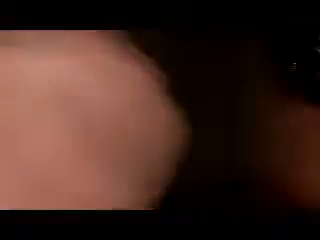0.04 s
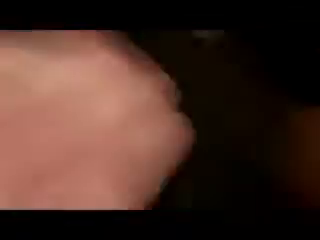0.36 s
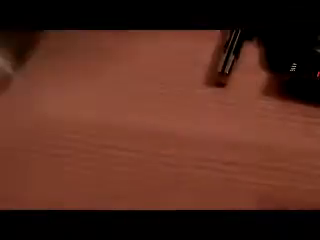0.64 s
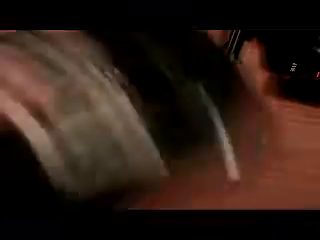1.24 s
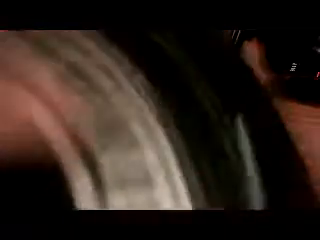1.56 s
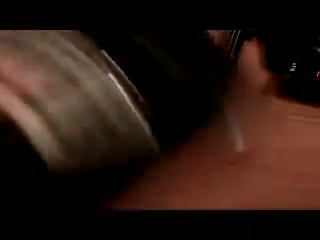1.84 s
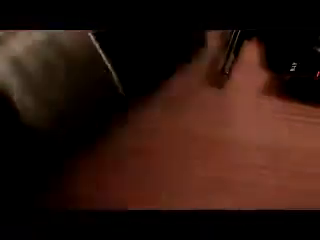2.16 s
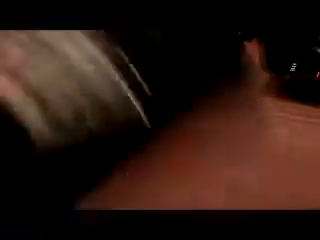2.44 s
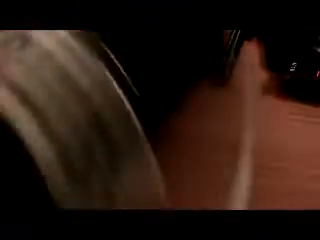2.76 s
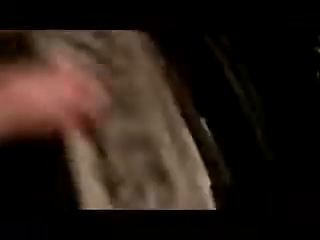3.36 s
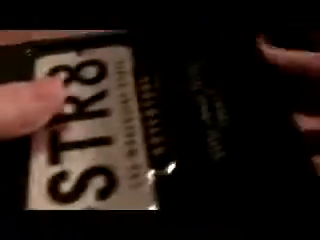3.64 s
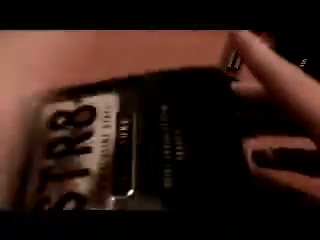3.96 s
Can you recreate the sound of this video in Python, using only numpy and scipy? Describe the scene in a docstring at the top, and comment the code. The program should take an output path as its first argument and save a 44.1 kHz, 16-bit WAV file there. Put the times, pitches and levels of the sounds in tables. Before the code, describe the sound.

A metal tin clatters with shaken loose items and is set down with a loud knock.

```python
"""Loose items clatter and slide in a metal tin, shaken by hand about six times a second.
Light items crackle against the walls; heavy ones make hollow, ringing clacks. In mid-shake
the tin knocks hard once on a wooden table. The shaking stops, the grip shifts with a few
small ticks, and the tin is set down with a knock that overloads the close microphone.
A small room adds a short echo."""
import sys
import numpy as np
from scipy import signal
from scipy.fft import rfft, irfft
from scipy.io import wavfile
from scipy.ndimage import uniform_filter1d

SR = 44100
rng = np.random.default_rng(int(sys.argv[2]) if len(sys.argv) > 2 else 0)


def master(y):
    """Save y as 16-bit WAV."""
    cut = np.clip(np.atleast_2d(y).T, -1, 1)
    pcm = np.round(cut * 32767)  # scale
    wavfile.write(sys.argv[1], SR, pcm.astype(np.int16))


N = 176400

# Levels in the tables are relative. A ring time (t60) is the time to fade by 60 dB.
# items tumble against a wall: t/s, build-up/s, light items' level/dB, heavy items' level/dB
CLATTERS = [(0.004, 0.001, -18.5, -22.5), (0.035, 0.0065, -16, -28), (0.096, 0.0027, -24.5, -18.5),
            (0.167, 0.001, -32, -22), (0.203, 0.0047, -22, -15), (0.254, 0.0057, -26.5, -15.5),
            (0.276, 0.003, -24, -22), (0.333, 0.0028, -23.5, -28), (0.3585, 0.018, -17.5, -19),
            (0.432, 0.0025, -19, -20.5), (0.526, 0.015, -21, -21), (0.588, 0.0084, -23, -19),
            (0.613, 0.0067, -22, -18.5), (0.691, 0.0052, -27, -32.5), (0.9026, 0.0022, -24, -22.5),
            (0.938, 0.0019, -17, -19.5), (1.01, 0.0078, -18, -19.5), (1.034, 0.0032, -19.5, -21),
            (1.068, 0.0043, -16, -18), (1.087, 0.0023, -12, -11.5), (1.164, 0.0082, -17, -17.5),
            (1.2378, 0.00096, -9, -13), (1.305, 0.0025, -18, -20.5), (1.318, 0.0083, -22.5, -17.5),
            (1.3883, 0.0048, -17.5, -19), (1.467, 0.0025, -23, -15), (1.542, 0.015, -20.5, -20),
            (1.679, 0.0011, -8, -15.5), (1.701, 0.0021, -18, -22), (1.765, 0.0064, -21, -16.5),
            (1.833, 0.011, -20.5, -24), (1.919, 0.0025, -18, -16), (1.982, 0.0062, -18.5, -22),
            (2.038, 0.017, -19.5, -25.5), (2.146, 0.0013, -16, -22), (2.188, 0.001, -19, -21),
            (2.219, 0.018, -29, -18), (2.2806, 0.0006, -24, -14), (2.369, 0.0022, -24.5, -14),
            (2.398, 0.011, -26.5, -16), (2.495, 0.0088, -20, -18), (2.535, 0.0065, -20, -12),
            (2.642, 0.0023, -16.5, -15), (2.677, 0.03, -27, -18), (2.827, 0.017, -23, -16.5),
            (2.927, 0.0023, -19, -28), (2.99, 0.0026, -22, -10), (3.037, 0.0014, -17.5, -36),
            (3.075, 0.015, -25, -36), (3.122, 0.0058, -19, -12.5), (3.164, 0.0051, -18.5, -20.5),
            (3.224, 0.0057, -21.5, -17), (3.269, 0.017, -20, -20.5), (3.43, 0.018, -21.5, -18.5)]
# items slide between clatters: t/s, heavy items' level/dB, light items' level/dB
SLIDING = [(0, -24.5, -29), (.62, -26.5, -32.5), (.76, -41, -41.5), (.89, -37, -43.5), (1.03, -24.5, -31),
           (2.8, -24.5, -27.5), (3.47, -30.5, -37.5), (3.7, -54.5, -57), (3.779, -40, -48),
           (3.86, -51, -44)]
# one heavy item hits the tin squarely: t/s, level/dB, f/Hz that the struck spot favours
CLACKS = [(0.772, -33, 1450), (0.839, -25, 1440), (1.017, -13, 510), (1.067, -15.5, 1200),
          (1.09, -15, 1690), (1.241, -13.5, 704), (1.39, -7.5, 690), (1.481, -12, 687), (1.919, -22, 1680),
          (2.043, -13.5, 1270), (2.399, -9.5, 1170), (2.54, -10, 1020), (2.648, -14, 835),
          (2.692, -12.5, 930), (2.782, -13, 1230), (2.832, -17, 1690), (3.122, -10, 707),
          (3.276, -11, 1130), (3.377, -16, 1220), (3.44, -15, 360)]
# the tin knocks on the table and rocks: t/s, ring level/dB, crack level/dB, thump level/dB
KNOCKS = [(2.9877, -15, 0.5, 2), (2.998, -32, -15, -20), (3.9257, 3, 8, 14.5), (3.945, -3.5, -37, -1),
          (3.961, -6, -4.5, -24)]
# ticks under the fingers: t/s, level/dB
TICKS = [(3.559, -5), (3.747, -9.5), (3.754, -5.5), (3.765, -3.5), (3.7786, -1)]
# the tin's own tones: f/Hz, ring time/s, level/dB hit from inside, level/dB knocked on the table
TIN_TONES = [(360.3, 0.19, -17.5, -17.5), (523.6, 0.12, -1, -14.5), (715.6, 0.11, 2.5, -13),
             (761.3, 0.17, 0.5, -11), (863.5, 0.17, 2.5, 1.5), (923.7, 0.27, -9.5, -6),
             (1006, 0.12, -6, -23), (1119, 0.11, -36, -0.5), (1250, 0.19, 3, -16.5), (1355.5, 0.1, -2, -7),
             (1479, 0.13, -1.5, -37), (1677, 0.14, 5.5, -22), (1730, 0.2, -7, -38)]
# thin, high tones of the items and the lid: f/Hz, ring time/s, level/dB
PING_TONES = [(2115, .06, 0), (2530, .04, 1), (3275, .1, 0), (5040, .1, 2), (5705, .08, 0), (10218, .06, 3)]
# tone colours, from low to high: f/Hz, level/dB
CRACKLE_COLOUR = [(800, -46.5), (2350, 5), (2900, -5.5), (3250, 0), (3700, -2), (5100, 1.5), (6200, 0.5),
                  (8200, 2), (10400, -3), (11600, -11.5), (14000, -11)]  # light, sharp edges
WALL_COLOUR = [(170, -31.5), (270, -10), (370, -2.5), (600, 0.5), (780, 2.5), (1300, 0.5), (1750, 2.5),
               (2050, -4.5), (3200, -9.5), (6000, -94)]  # hollow tin walls
CRACK_COLOUR = [(100, -24), (240, -5.5), (950, 4.5), (1720, -12.5), (2200, -10), (6000, -27), (14000, -34)]  # tin on wood
THUMP_COLOUR = [(20, -11), (60, -12), (140, -3), (260, -13), (1500, -34)]  # the table top
BACKGROUND_COLOUR = [(20, -6), (50, 0), (70, -10), (240, -11), (800, -17), (14000, -37)]  # low rumble and faint hiss

CRACKLES_PER_S, BUMPS_PER_S, SLIPS_PER_S = 2400, 1100, 1600
RATTLE_T60_S, RATTLE_DB = 0.044, 4  # short, dense ringing of the light items
HOLLOW_T60_S, HOLLOW_DB = 0.084, 2  # short, dense ringing of the walls
ROOM_T60_S, ROOM_DB, ROOM_DELAY_S = 0.19, -7, 0.011


def loose_items():
    """Light edges crackle, heavier items bump the walls and ring the tin; both slide in between."""
    start, rise, light_db, heavy_db = np.transpose(CLATTERS)
    slide_s, heavy_slide_db, light_slide_db = np.transpose(SLIDING)
    light = sliding(slide_s, light_slide_db - 2)
    heavy = sliding(slide_s, heavy_slide_db - 4.5)
    light_force = clatter_force(start, rise, light_db, fall_s=0.006)
    heavy_force = clatter_force(start, rise, heavy_db, fall_s=0.0062)
    light += tiny_hits(CRACKLES_PER_S, spread_db=2) * light_force
    heavy += tiny_hits(BUMPS_PER_S, spread_db=0) * heavy_force
    # harder hits are shorter and so brighter
    light += np.convolve(0.99 * light_force * light, [-1, 2, -1], "same")
    crackle = through(moving_spots(light, RATTLE_T60_S, RATTLE_DB), colour(CRACKLE_COLOUR))
    bumps = from_db(-1) * hollow_walls(heavy)
    tin_ring = from_db(-2.5) * ring_tones(heavy, [row[:3] for row in TIN_TONES])
    pings = from_db(-9.5) * ring_tones(light, PING_TONES)
    return from_db(2) * crackle + bumps + tin_ring + pings


def clatter_force(starts, rises, levels_db, fall_s):
    """Each clatter starts suddenly, builds to its peak and dies away."""
    first_touch = 0.61  # share of the peak force
    t = np.arange(SR // 5) / SR
    power = np.zeros(N + SR)
    for start, rise, db in zip(starts, rises, levels_db):
        build = np.minimum(first_touch + (1 - first_touch) * t / rise, 1)
        fade = np.exp(-np.maximum(t - rise, 0) / fall_s)
        i = int(start * SR)
        power[i:i + len(t)] += (from_db(db) * build * fade) ** 2
    return np.sqrt(power[:N])


def sliding(times, levels_db):
    """Sliding items stick and slip, so their tiny hits come in clumps."""
    slips = tiny_hits(SLIPS_PER_S, spread_db=5) * wander(spread_db=4, step_s=0.014)
    return slips * from_db(np.interp(np.arange(N) / SR, times, levels_db))


def tiny_hits(per_s, spread_db):
    """Tiny clicks at random times, their power evened out to about 1."""
    present = rng.random(N) < per_s / SR
    strength = from_db(spread_db * np.minimum(rng.exponential(1, N), 4))
    clicks = present * strength * rng.choice([-1, 1], N)
    power = np.maximum(uniform_filter1d(clicks ** 2, 700), 0)
    return clicks / np.sqrt(power + 1e-4)


def ring_tones(clicks, tones):
    """Every hit lands somewhere else, so it rings each tone with a different strength."""
    shapes = [from_db(db) * wall_tone(hz, t60) for hz, t60, db in tones]
    ringing = sum(through(clicks * rng.normal(0, 1, N) * wander(spread_db=3, step_s=0.047), shape)
                  for shape in shapes)
    return ringing / np.sqrt(np.sum(np.square(shapes)))


def moving_spots(clicks, t60, tail_db, count=7, stay_s=0.045):
    """The items move from spot to spot; each spot rings and reaches the room in its own way."""
    turn = (np.arange(N) / SR / stay_s).astype(int) % count
    spot = rng.permutation(count)[turn]
    sound = np.zeros(N)
    for k in range(count):
        response = click_with_tail(t60, tail_db) + from_db(ROOM_DB) * tail(ROOM_T60_S, ROOM_DELAY_S)
        sound += through(clicks * (spot == k), unit_energy(response))
    return sound


def hollow_walls(clicks):
    """The walls answer each hit with a short, hollow sound."""
    return through(moving_spots(clicks, HOLLOW_T60_S, HOLLOW_DB), colour(WALL_COLOUR))


def heavy_clacks():
    """A heavy item gives a hollow clack, and the tones that the struck spot favours ring on."""
    times, db, spot_hz = np.transpose(CLACKS)
    spot_octaves = 0.081  # tones further off than this hardly ring
    ringing = np.zeros(N)
    for hz, t60, _, _ in TIN_TONES:
        loss_db = 10 * np.log10(1 + (np.log2(hz / spot_hz) / spot_octaves) ** 4)
        ringing += through(clicks_at(times, db - 4 - loss_db), wall_tone(hz, t60))
    return ringing + hollow_walls(clicks_at(times, db + 15))


def knock_crack():
    """Tin meets wood with a short, rattling crack."""
    times, _, db, _ = np.transpose(KNOCKS)
    crack = through(clicks_at(times, db + 20.5), colour(CRACK_COLOUR))
    return through(crack, click_with_tail(t60=0.031, tail_db=9))


def knock_ring():
    """The whole tin rings after each knock."""
    times, ring_db, _, _ = np.transpose(KNOCKS)
    body = sum((-1) ** k * from_db(db) * wall_tone(hz, t60)
               for k, (hz, t60, _, db) in enumerate(TIN_TONES))
    return through(clicks_at(times, ring_db), body)


def table_thump():
    """The table top gives a short, dry thud under each knock."""
    times, _, _, db = np.transpose(KNOCKS)
    return through(clicks_at(times, db - 1.5), colour(THUMP_COLOUR))


def grip_ticks():
    """The fingers make rough little snaps as the grip shifts."""
    times, db = np.transpose(TICKS)
    snaps = through(clicks_at(times, db - 2), colour(CRACKLE_COLOUR))
    return through(snaps, click_with_tail(t60=0.03, tail_db=1))


def background():
    """A faint, steady rumble and hiss."""
    return from_db(-55) * through(rng.standard_normal(N), colour(BACKGROUND_COLOUR))


def wall_tone(hz, t60):
    """One fading tone, about 1 high: the speed of a wall swinging to and fro."""
    t = np.arange(SR // 2) / SR
    onset = 1 - np.exp(-10 * hz * t)
    swing = np.sin(2 * np.pi * hz * t) * from_db(-60 * t / t60) * onset
    return np.gradient(swing) / np.sin(2 * np.pi * hz / SR)


def click_with_tail(t60, tail_db, delay_s=0):
    """The direct sound, then its dense ringing or echo."""
    response = from_db(tail_db) * tail(t60, delay_s)
    response[0] += 1
    return unit_energy(response)


def tail(t60, delay_s):
    """Many echoes blur into fading noise."""
    t = np.arange(SR // 3) / SR
    return unit_energy(rng.standard_normal(len(t)) * from_db(-60 * t / t60) * (t >= delay_s))


def colour(points, size=4096):
    """A click with the given tone colour, for use as a filter."""
    hz, db = np.transpose(points)
    grid_hz = np.maximum(np.arange(size // 2 + 1) * SR / size, 1)
    log_gain = np.log(from_db(np.interp(np.log(grid_hz), np.log(hz), db)))
    # folding packs the energy at the start of the click (minimum phase)
    fold = 1 + np.sign(size // 2 - np.arange(size))
    fold[0] = 1
    return unit_energy(irfft(np.exp(rfft(irfft(log_gain) * fold))))


def clicks_at(times, db):
    """One click for each hit."""
    clicks = np.zeros(N)
    clicks[(times * SR).astype(int)] = from_db(db)
    return clicks


def wander(spread_db, step_s):
    """A volume that drifts up and down at random."""
    steps = np.arange(N) / SR / step_s
    return from_db(spread_db * np.interp(steps, np.arange(N), rng.standard_normal(N)))


def through(x, response):
    return signal.oaconvolve(x, response)[:N]


def unit_energy(x):
    return x / np.sqrt(np.sum(x ** 2) + 1e-20)


def from_db(db):
    return 10 ** (np.asarray(db) / 20)


def scene():
    """All sources at one microphone, the same in both channels."""
    rumble = background()
    handling = through(grip_ticks() + knock_crack(), click_with_tail(ROOM_T60_S, ROOM_DB, ROOM_DELAY_S))
    mono = loose_items() + heavy_clacks() + handling + knock_ring() + table_thump() + rumble
    return np.array([mono, mono])


def record(dry):
    """The knocks overload the input, which flattens their peaks; the highest treble is cut."""
    clipped = dry / (1 + dry ** 8) ** (1 / 8)
    treble_cut = signal.ellip(10, 0.1, 80, 14300, fs=SR, output="sos")
    return signal.sosfilt(treble_cut, clipped)


dry = scene()
out = record(dry)
master(out)
```